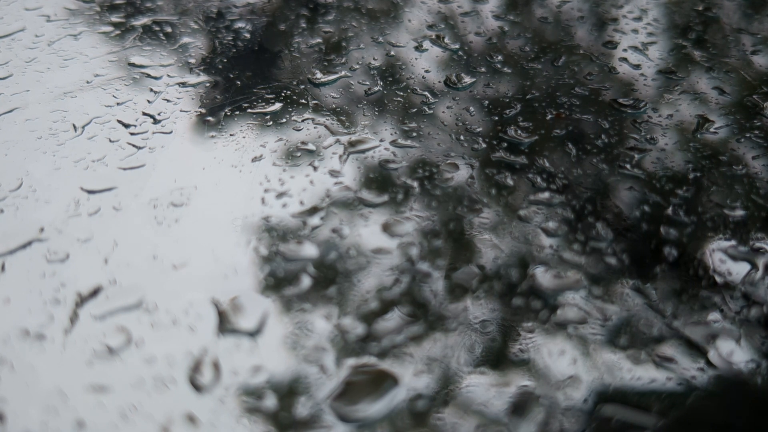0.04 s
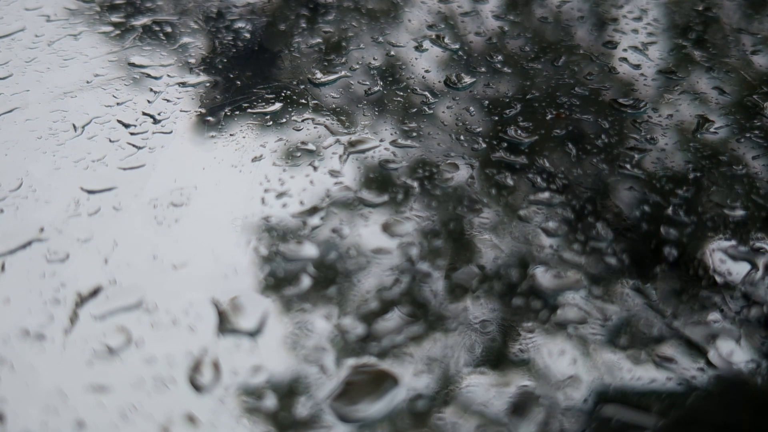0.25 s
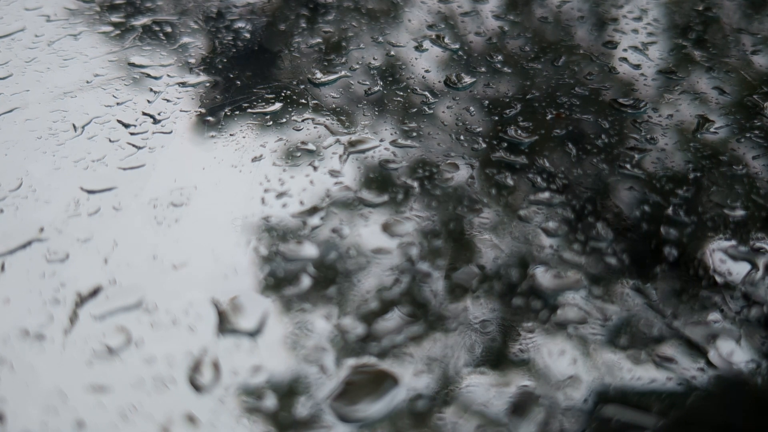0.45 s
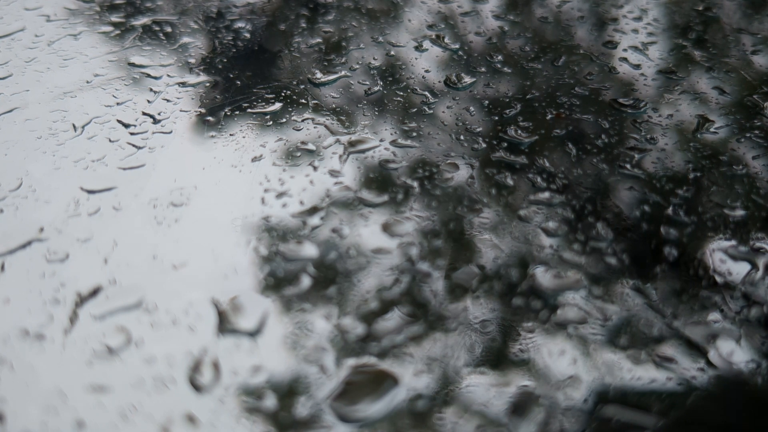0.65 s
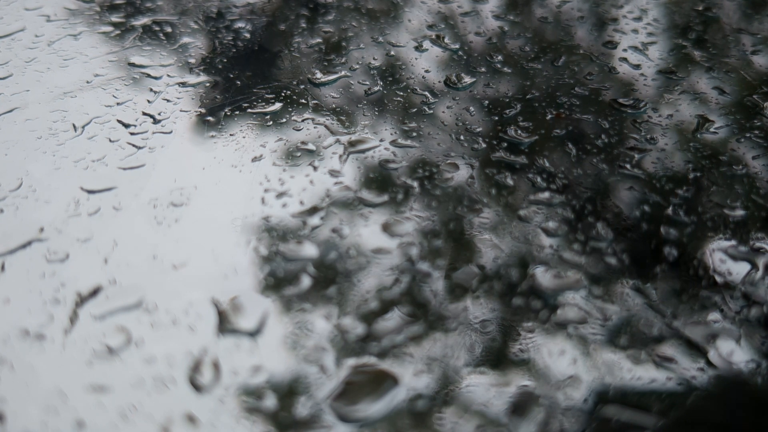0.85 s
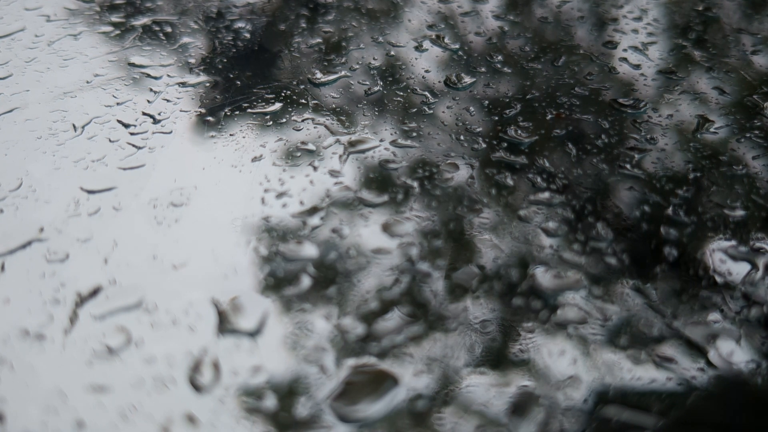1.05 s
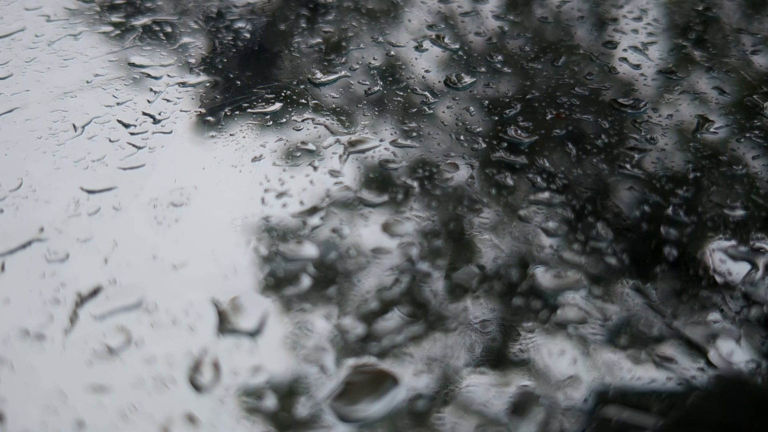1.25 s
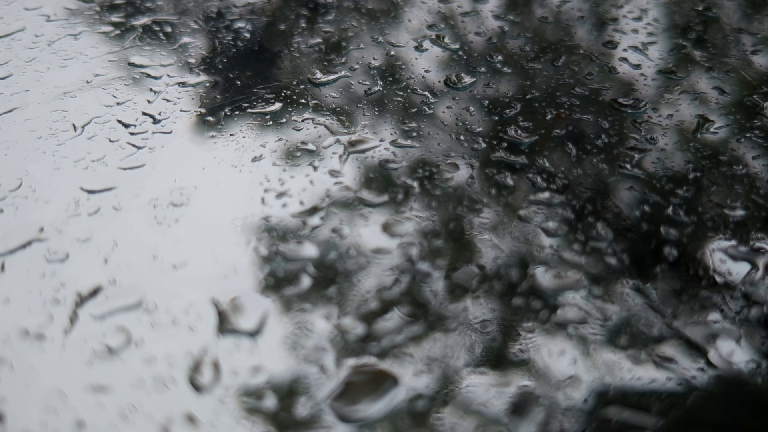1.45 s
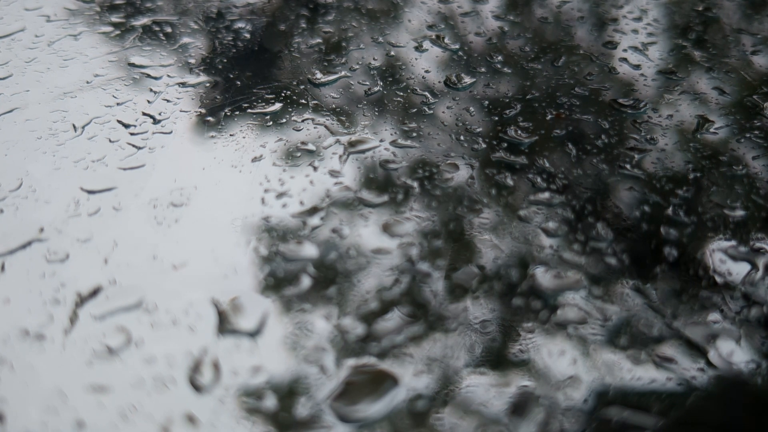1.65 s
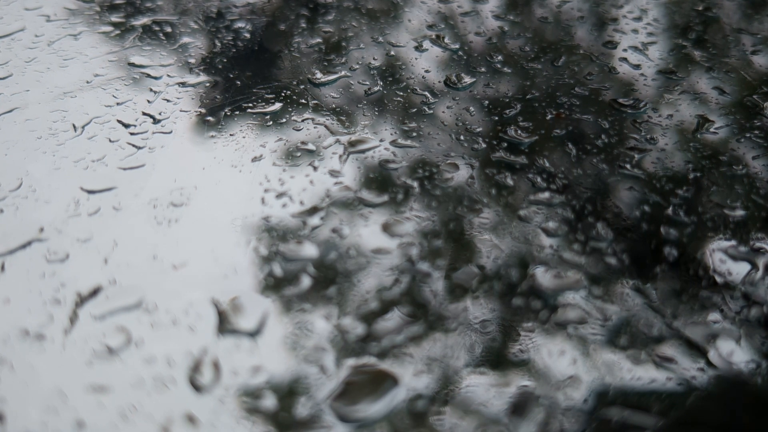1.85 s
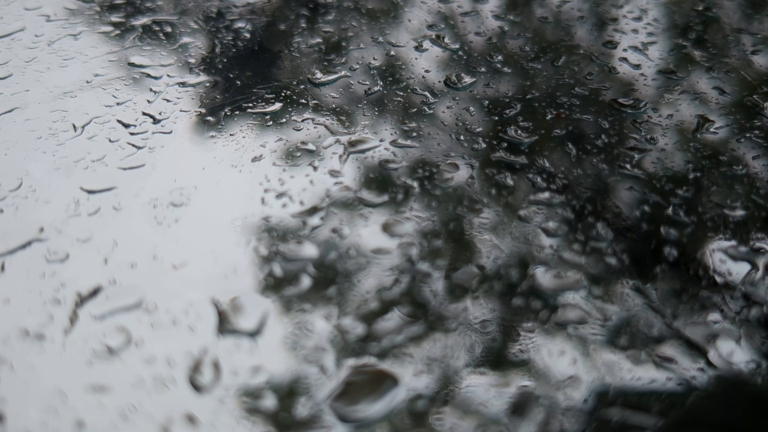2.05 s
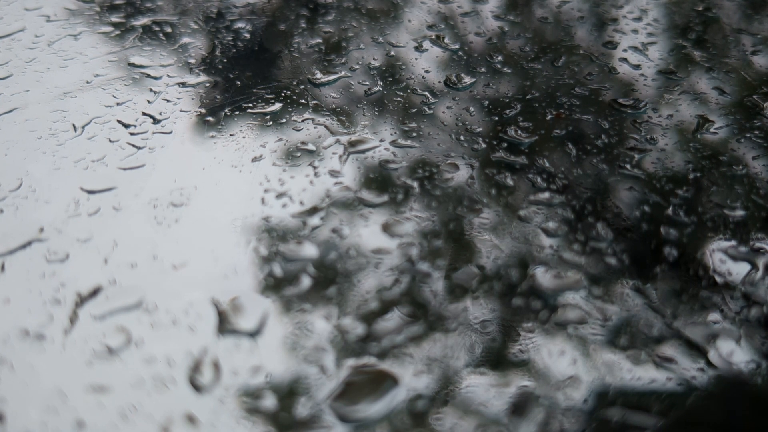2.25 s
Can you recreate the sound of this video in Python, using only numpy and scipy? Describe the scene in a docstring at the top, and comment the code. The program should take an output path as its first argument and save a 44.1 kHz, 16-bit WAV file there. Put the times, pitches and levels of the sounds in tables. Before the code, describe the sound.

Distant thunder rolls in almost at once, rumbling in uneven swells with some dull crackle and thuds, then ebbs. Softer rain hisses steadily outside a window throughout, with a few nearer drops splashing in the second half.

```python
"""Steady rain outside a window: far drops merge into a hiss, small ones tick in it.
From 0.2 s distant thunder rolls in uneven swells, a crowd of shock fronts dulled by distance:
deep ones rumble and roar, finer ones crackle, a few thud, and all scatter off the surroundings.
Near 0.85 s a brief low tone steps down in pitch. Two nearer drops splash around 1.4 s.
After 1.6 s the thunder ebbs; a last drop splashes near 2.2 s."""
import sys
import numpy as np
from scipy import signal
from scipy.fft import rfft, irfft, next_fast_len
from scipy.io import wavfile
from scipy.ndimage import uniform_filter1d

SR = 44100
rng = np.random.default_rng(int(sys.argv[2]) if len(sys.argv) > 2 else 0)


def inscribe(sig):
    """Save sig as 16-bit PCM at rate SR to the path in sys.argv[1].

    A 1-D sig is mono; a 2-D sig holds one channel per row.
    Samples are clipped to [-1, 1] before scaling.
    """
    pcm = np.round(np.clip(np.atleast_2d(sig).T, -1, 1) * 32767)
    wavfile.write(sys.argv[1], SR, pcm.astype(np.int16))


N = 101429
TIME_S = np.arange(N) / SR
FFT_SIZE = next_fast_len(N + SR)
FREQ_HZ = np.maximum(np.arange(FFT_SIZE // 2 + 1) * SR / FFT_SIZE, 1)
SIDES = np.array([[1], [-1]])  # left, right

# Table levels are relative.
# deep rumble swells: t/s, level/dB
RUMBLE_SWELLS = [(0, -59), (.1, -46.5), (.17, -50), (.2, -38), (.28, -32), (.35, -41), (.42, -36),
                 (.48, -23.5), (.52, -23.5), (.57, -19.5), (.63, -28.5), (.7, -32), (.78, -35.5),
                 (.82, -20), (.87, -40), (.93, -35), (.97, -23), (1.03, -20.5), (1.1, -23.5), (1.18, -40),
                 (1.3, -33), (1.43, -35), (1.47, -24.5), (1.53, -29.5), (1.59, -19.5), (1.68, -27),
                 (1.76, -36), (1.82, -27.5), (1.88, -37.5), (2.0, -43), (2.05, -30), (2.11, -33),
                 (2.18, -37.5), (2.3, -41.5)]
# rumble spectrum: f/Hz, level/dB
RUMBLE_SPECTRUM = [(22, -38), (48, -20), (62, 0), (80, -6.5), (102, 1.5), (170, 1.5), (240, -2), (350, -10),
                   (700, -54), (2000, -75)]
# low-mid roar swells: t/s, level/dB
ROAR_SWELLS = [(0, -50.5), (.1, -46.5), (.18, -49), (.23, -30), (.29, -29.5), (.35, -37), (.45, -36.5),
               (.5, -24), (.57, -19.5), (.63, -22.5), (.71, -31), (.78, -31), (.82, -27), (.92, -29.5),
               (1.0, -25), (1.07, -21.5), (1.15, -27.5), (1.25, -37.5), (1.32, -29.5), (1.42, -36.5),
               (1.48, -31), (1.52, -34), (1.56, -23.5), (1.61, -25), (1.68, -25.5), (1.76, -35),
               (1.83, -32), (1.94, -38.5), (2.06, -37), (2.17, -40.5), (2.22, -36), (2.3, -39)]
# roar spectrum: f/Hz, level/dB
ROAR_SPECTRUM = [(110, -25), (220, -2.5), (275, -3), (355, -1.5), (415, -6), (460, -5), (520, -8.5),
                 (700, -18), (2000, -63)]
# fine crackle swells: t/s, level/dB
CRACKLE_SWELLS = [(0, -79), (.19, -53), (.25, -37.5), (.35, -45), (.46, -44), (.51, -32), (.56, -29.5),
                  (.63, -32), (.7, -37), (.795, -40), (.818, -29.5), (.85, -37), (.94, -35), (1.0, -34.5),
                  (1.07, -31), (1.13, -37), (1.22, -41.5), (1.35, -37.5), (1.44, -43), (1.53, -37),
                  (1.56, -34), (1.64, -39), (1.74, -40), (1.83, -39), (1.92, -54), (2.01, -49),
                  (2.05, -41.5), (2.17, -47.5), (2.3, -49.5)]
# crackle spectrum: f/Hz, level/dB
CRACKLE_SPECTRUM = [(250, -24), (520, -3), (640, 2), (770, 4), (950, 1.5), (1200, 1), (1500, -4),
                    (1850, -6), (2700, -17), (4500, -37), (9000, -70)]
# single strong shock fronts: t/s, level/dB
STRONG_FRONTS = [(0.193, -25), (0.226, -25.5), (0.436, -19), (0.459, -16), (0.499, -9.5), (0.526, -15),
                 (0.734, -20.5), (0.810, -22.5), (0.959, -12), (0.996, -12), (1.014, -17.5), (1.074, -14),
                 (1.135, -17), (1.317, -22.5), (1.367, -19.5), (1.453, -21.5), (1.576, -19), (1.799, -16.5),
                 (2.030, -18), (2.093, -24)]
# tones in the roll: t/s, f/Hz, level/dB
ROLL_TONES = [(0.847, 368, -26.5), (0.875, 340, -26)]
# sideways thunder scatter: f/Hz, level/dB re direct
SIDE_SCATTER = [(30, -18), (70, -31), (160, -25), (330, -25.5), (600, -6.5), (1200, -4.5), (2500, -1)]
# thunder balance: f/Hz, L-R/dB
THUNDER_PAN = [(80, -0.5), (350, -0.6), (470, -2.5), (620, 1), (800, -4), (1800, -3.5), (3000, 2.5)]
# rain hiss spectrum: f/Hz, level/dB
HISS_SPECTRUM = [(25, -4), (75, 11), (200, -4), (350, 3.5), (600, -1), (1100, 4), (2000, -0.5),
                 (3300, -5.5), (4300, -11), (5500, -19), (6700, -17), (8100, -24.5), (9300, -19.5),
                 (11700, -19.5), (13800, -28), (15500, -26.5)]
# left-right likeness of the hiss: f/Hz, coherence/1
HISS_COHERENCE = [(100, 1), (500, 1), (1500, 0.61), (2800, 0.31), (5000, 0.066), (12000, .05)]
# rain balance: f/Hz, L-R/dB
RAIN_PAN = [(300, 3), (1500, -.5), (3000, 1.7), (6000, 3), (10000, 3), (14000, 1)]
# rain treble swells: t/s, level/dB
SPRAY_SWELLS = [(0, 0), (.12, 0.5), (.21, 3.3), (.31, 0.7), (.7, 0.8), (.85, 1.5), (1.0, 1.5), (1.19, 0.5),
                (1.28, 2), (1.37, 0), (1.48, 2.2), (1.55, 0), (1.83, 1.2), (1.93, 1.8), (2.14, 0.8),
                (2.2, 1.8), (2.3, 2.5)]
# near drops: t/s, level/dB, L-R/dB
NEAR_DROPS = [(1.393, -43, 6), (1.465, -45, 0), (2.179, -37, 2)]
# tick and splash spectrum: f/Hz, level/dB
DROP_SPECTRUM = [(600, -68), (1800, 11), (3000, 5), (5500, -6.5), (11000, -9.5), (15000, -20)]
# wall and pane resonances: f/Hz, width/Hz, level/dB
WALL_MODES = [(99.4, 13.2, -4.5), (166.6, 16, -8), (263.7, 9.6, -8), (353, 37, -7), (458, 15.6, -6),
              (534.4, 8.6, -5.5), (757, 16, -1.5), (884, 21, -8.5), (1844, 42, -9)]


def thunder(rumble_db=-2.54, roar_db=-0.75, crackle_db=2.9, echo_db=-7):
    """Rumble, roar and crackle swell and fade, partly from the side; thuds stand out and echo."""
    roll = shock_crowd(RUMBLE_SPECTRUM, RUMBLE_SWELLS, rumble_db, per_s=600, spread_db=2.5)
    roll += shock_crowd(ROAR_SPECTRUM, ROAR_SWELLS, roar_db, per_s=900, spread_db=3)
    roll += shock_crowd(CRACKLE_SPECTRUM, CRACKLE_SWELLS, crackle_db, per_s=1300, spread_db=2.5)
    scatter = from_db(over_hz(SIDE_SCATTER))
    power_split = np.array([np.ones_like(scatter), scatter]) / np.sqrt(1 + scatter ** 2)
    direct, side = filtered(roll, power_split)
    strong = thuds()
    mid = direct + strong + from_db(echo_db) * echoes(strong) + hollow_tone()
    return stereo(mid, side, THUNDER_PAN)


def shock_crowd(spectrum, swells, gain_db, per_s, spread_db):
    """Fronts arrive at random, dulled alike, and swell together: a direct and a scattered stream."""
    fronts = filtered(impacts(per_s, spread_db), from_db(over_hz(spectrum)))
    return from_db(gain_db + over_time(swells)) * levelled(fronts)


def thuds(length_s=0.00491, band_hz=(105, 486), trim_db=-3):
    """Each strong front is an N-shaped pressure pulse, rounded by distance."""
    pulses = np.zeros(N)
    for onset_s, db in STRONG_FRONTS:
        phase = (TIME_S - onset_s) / (length_s * rng.uniform(0.72, 1.263))
        pulses += from_db(db + trim_db) * (2 * phase - 1) * ((phase > 0) & (phase < 1))
    rounding = signal.butter(2, band_hz, "band", fs=SR, output="sos")
    return 2 * signal.sosfilt(rounding, pulses + 1e-18)


def echoes(x, t60_s=0.76):
    """Decaying cloud of reflections, nearly flat in spectrum."""
    decay = from_db(-60 * np.minimum(TIME_S / t60_s, 3))
    cloud = rfft(rng.standard_normal(N) * decay, FFT_SIZE)
    return filtered(x, cloud / np.sqrt(uniform_filter1d(np.abs(cloud) ** 2, size=120)))


def hollow_tone(width_s=0.015):
    """A low tone swells and dies within the roll, stepping down in pitch."""
    tone = np.zeros(N)
    for peak_s, hz, db in ROLL_TONES:
        envelope = from_db(db) * np.exp(-((TIME_S - peak_s) / width_s) ** 2)
        tone += envelope * np.sqrt(2) * np.sin(2 * np.pi * (hz * TIME_S + rng.random()))
    return tone


def rain(hiss_db=-40, ticks_db=-55.5, spray_hz=3200):
    """Far drops merge into a hiss; nearer ones tick on either side. The treble swells slightly."""
    mid_side_gain = np.sqrt(1 + SIDES * np.clip(over_hz(HISS_COHERENCE), -1, 1))
    mid, side = filtered(rng.standard_normal((2, N)), from_db(over_hz(HISS_SPECTRUM)) * mid_side_gain)
    hiss = stereo(mid, side, RAIN_PAN)
    tick_gain = from_db(over_hz(DROP_SPECTRUM) + SIDES * over_hz(RAIN_PAN) / 2)
    ticks = filtered(impacts(per_s=750, spread_db=6), tick_gain)
    shower = from_db(hiss_db) * unit_rms(hiss) + from_db(ticks_db) * unit_rms(ticks)
    spray = filtered(shower, FREQ_HZ ** 4 / (FREQ_HZ ** 4 + spray_hz ** 4))
    return shower + spray * (from_db(over_time(SPRAY_SWELLS)) - 1)


def splashes(rise_s=0.002, t60_s=0.082):
    """Each near drop bursts into a short spatter."""
    spatter = unit_rms(filtered(rng.standard_normal((2, N)), from_db(over_hz(DROP_SPECTRUM))))
    envelope = np.zeros((2, N))
    for onset_s, db, pan_db in NEAR_DROPS:
        age_s = TIME_S - onset_s
        attack = np.clip(age_s / rise_s, 0, 1)
        envelope += attack * from_db(db + SIDES * pan_db / 2 - 60 * np.abs(age_s) / t60_s)
    return spatter * envelope


def surroundings(x, direct_gain=0.92):
    """Nearby walls and the pane ring weakly at a few pitches."""
    ringing = sum(from_db(db) / (1 + 2j * (FREQ_HZ - hz) / width_hz) for hz, width_hz, db in WALL_MODES)
    return filtered(x, direct_gain + ringing)


def impacts(per_s, spread_db):
    """Two independent click streams, random in time, size and sign."""
    size = from_db(spread_db * np.minimum(rng.exponential(1, (2, N)), 3))
    sign = rng.choice([-1, 1], (2, N))
    return size * sign * (rng.random((2, N)) < per_s / SR)


def stereo(mid, side, pan, left_lag_s=0.00035):
    """Mid/side to L/R; sound from the right reaches the left ear later."""
    lag = np.exp(-2j * np.pi * FREQ_HZ * left_lag_s * np.array([[1], [0]]))
    return filtered(mid + SIDES * side, lag * from_db(SIDES * over_hz(pan) / 2))


def levelled(x, window_s=0.027):
    """Unit running rms, fine grain kept."""
    window = int(window_s * SR)
    power = uniform_filter1d(uniform_filter1d(x ** 2, window), window)
    return x / np.sqrt(np.abs(power) + 1e-20)


def filtered(x, gain):
    """Apply a gain per FFT bin."""
    return irfft(rfft(x, FFT_SIZE) * gain, FFT_SIZE)[..., :N]


def over_time(table):
    """Table value per sample."""
    return np.interp(TIME_S, *np.transpose(table))


def over_hz(table):
    """Table value per FFT bin, interpolated on log f."""
    hz, value = np.transpose(table)
    return np.interp(np.log(FREQ_HZ), np.log(hz), value)


def from_db(db):
    """dB to gain."""
    return 10 ** (np.asarray(db) / 20)


def unit_rms(x):
    """Scale to rms 1."""
    return x / np.sqrt(np.mean(x ** 2) + 1e-20)


def scene():
    """Thunder and rain, coloured by the surroundings."""
    return surroundings(thunder() + rain() + splashes())


def record(dry, low_cut_hz=33, high_cut_hz=15700):
    """Deep bass rolled off, top cut steeply."""
    high_pass = signal.butter(2, low_cut_hz, "high", fs=SR, output="sos")
    return filtered(signal.sosfilt(high_pass, dry), 1 / np.sqrt(1 + (FREQ_HZ / high_cut_hz) ** 400))


dry = scene()
out = record(dry)
inscribe(out)
```